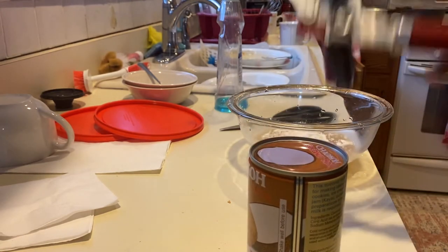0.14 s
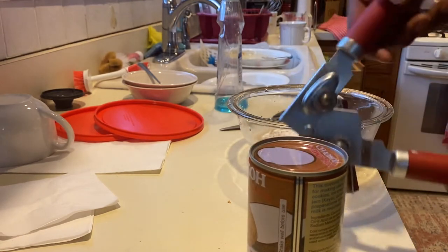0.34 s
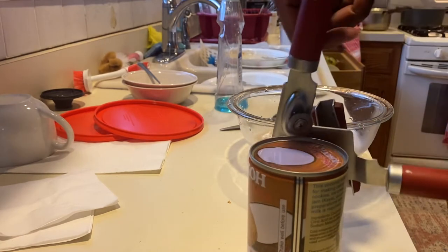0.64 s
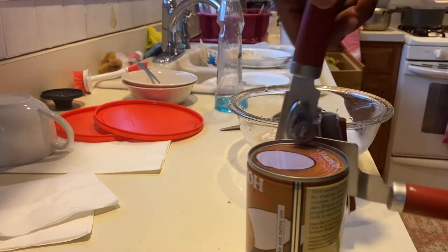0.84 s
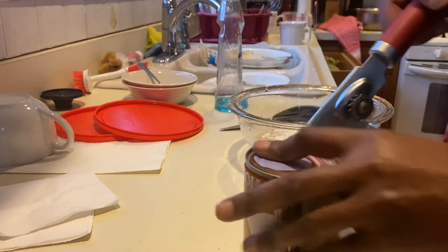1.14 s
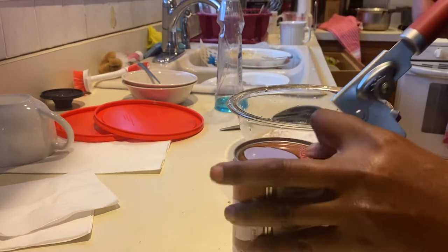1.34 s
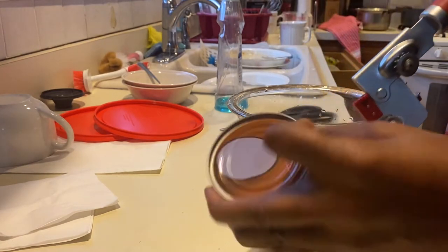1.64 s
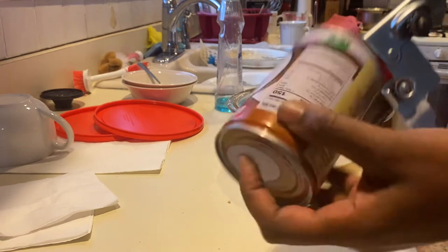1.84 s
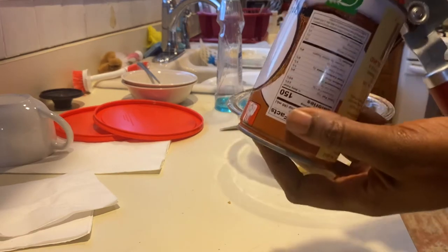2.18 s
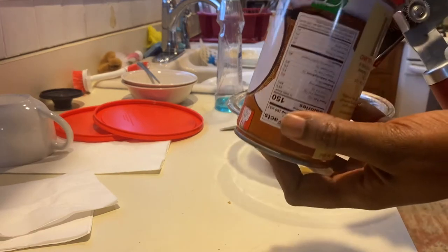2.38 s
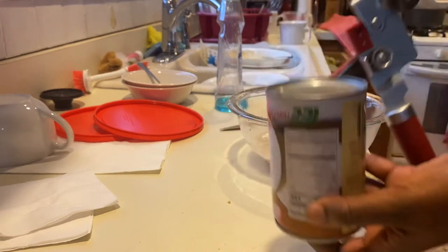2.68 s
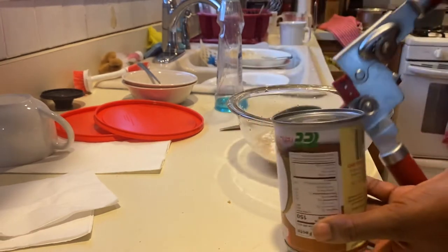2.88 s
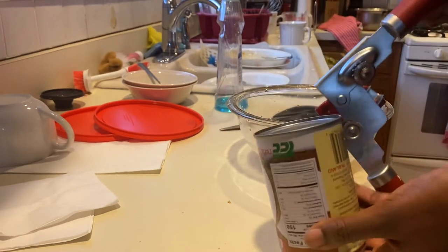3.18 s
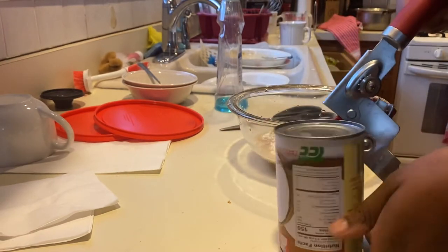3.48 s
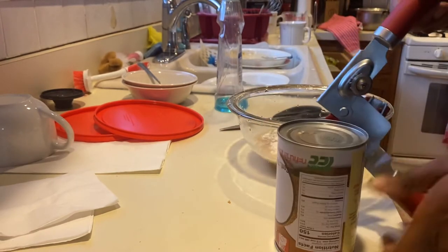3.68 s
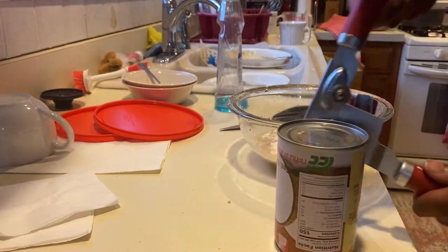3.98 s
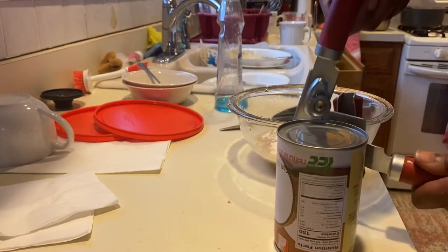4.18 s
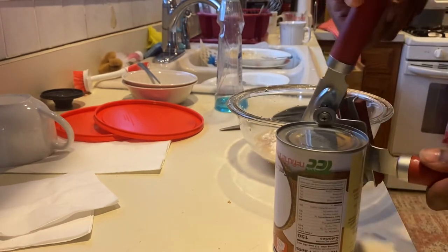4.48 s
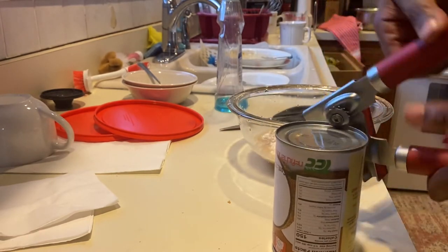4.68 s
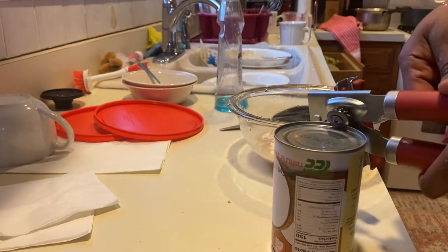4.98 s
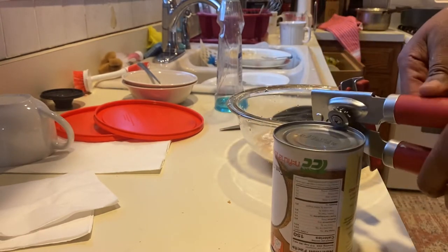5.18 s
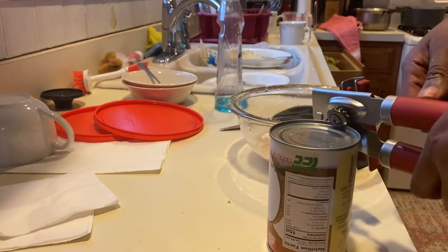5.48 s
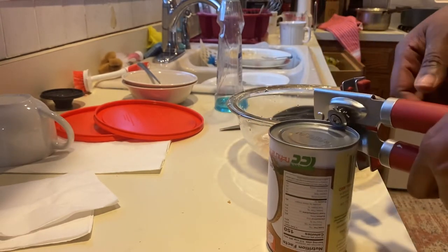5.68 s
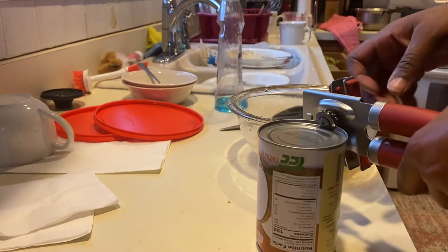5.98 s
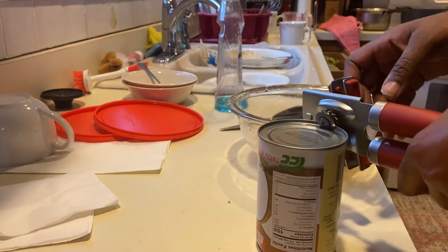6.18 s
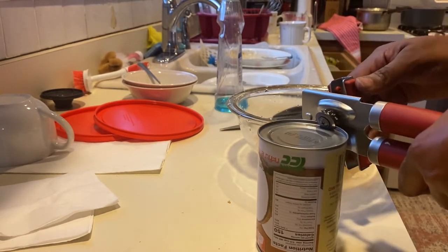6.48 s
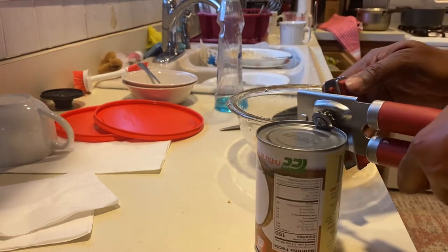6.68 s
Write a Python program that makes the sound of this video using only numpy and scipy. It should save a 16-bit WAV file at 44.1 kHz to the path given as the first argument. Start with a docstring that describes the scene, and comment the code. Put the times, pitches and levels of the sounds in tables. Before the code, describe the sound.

A faint low refrigerator hum with a dull rush runs throughout a small, hard kitchen with a short bright echo. After near quiet, the steel opener clacks on the can rim at about 0.65 s, with a rough scrape and lighter clack at 0.8 and soft handling at 1.0-1.5. The full can is turned: faint rising liquid gurgles at 1.8-2.05, a sharp can knock at 2.8, another at 3.0 with a short gurgle. Small clicks and scraping lead to the loudest early blow, a hard thud on the counter at 3.5. Opener clacks follow at 3.8, 4.2 (firm) and 4.8, then only slight rubbing. At 5.7 the blade punches the lid with a bright, ringing metallic crack. A thin, fluttering, whistling hiss fades away, with a tiny squeak near 6.1, before a sudden sputtering burst of air at 6.7 and a small clack at 6.8.

```python
"""In a small, hard kitchen a full tin can is turned over, set down on the counter and gripped with a can opener.
Steel clacks on the rim: each blow is noise and dying modes, shaped in five bands. Strokes are rough, filtered noise.
The contents gurgle as gliding sines, the blade punches the lid and air hisses in through the cut as whistling noise.
A refrigerator hums behind it as steady tones over dull noise, and the room adds a short echo."""
import sys
import numpy as np
from scipy import signal
from scipy.fft import rfft, irfft
from scipy.io import wavfile
from scipy.ndimage import uniform_filter1d

SR = 44100
rng = np.random.default_rng(int(sys.argv[2]) if len(sys.argv) > 2 else 0)


def to_wav(s):
    """Save 16-bit WAV."""
    ch = np.atleast_2d(s).T  # columns
    pcm = np.round(np.clip(ch, -1, 1) * 32767)  # PCM
    wavfile.write(sys.argv[1], SR, pcm.astype(np.int16))


N = 301644


def amp(db):
    """Decibels to gain."""
    return 10 ** (np.asarray(db) / 20)


def unit(x):
    """Scales to rms 1."""
    return x / np.sqrt(np.mean(x ** 2) + 1e-20)


def read(points, hz):
    """Reads (f/Hz, value) points on a log-frequency axis."""
    f, value = np.transpose(points)
    return np.interp(np.log(hz + 1), np.log(f + 1), value)


def add(mix, s, sound):
    """Mixes a stereo sound in at time s."""
    part = mix[:, max(round(s * SR), 0):][:, :sound.shape[1]]
    part += sound[:, :part.shape[1]]


def bins(size):
    """Frequencies of a spectrum, in Hz."""
    return np.fft.rfftfreq(size, 1 / SR)


# how alike the two microphones hear noise: (f/Hz, likeness: 1 same, 0 unrelated, negative leans to opposite)
STEREO_LIKENESS = [(60, 1), (200, 0.83), (500, 0.3), (1200, 0.065), (2300, 0.56), (6000, 1), (8800, -0.85),
                   (11200, 1), (13400, -0.69), (15300, 1)]


def noise_pair(size):
    """White noise at two microphones, with a likeness that depends on frequency."""
    left, other = rfft(rng.standard_normal((2, size)))
    like = np.clip(read(STEREO_LIKENESS, bins(size)), -1, 1)
    right = like * left + np.sqrt(1 - like ** 2) * other
    return irfft([left, right], size)


def tinted(x, colour):
    """Gives x a spectral colour, at rms 1."""
    return unit(irfft(rfft(x) * amp(read(colour, bins(N))), N))


def slow_gain(samples):
    """Random modulation at rms 1, smoothed over a number of samples."""
    return unit(uniform_filter1d(rng.standard_normal(N), samples))


def dying(x, t60s, stretch=1):
    """Lets each frequency of x die at its own speed."""
    hz, t, z = signal.stft(x, SR, nperseg=128)
    fade = amp(-60 * t / (stretch * read(t60s, hz)[:, None]))
    return signal.istft(z * fade, SR, nperseg=128)[1][:, :x.shape[1]]


def ring(hz, db, t60, t):
    """One dying mode, as a turning phasor."""
    return amp(db) * np.exp((2j * np.pi * hz - np.log(1000) / t60) * t)


def swell(s, rise, fall, db, curve):
    """Gain that peaks at time s and is 20 dB down a rise earlier and a fall later."""
    t = np.arange(N) / SR - s
    away = np.minimum(np.maximum(-t / rise, t / fall), 10)
    return amp(db - 20 * away ** curve)


# steady tones of mains and compressor: (f/Hz, rms level/dB before the stereo balance)
HUM_TONES = [(59.4, -50.5), (57, -58.5), (123.4, -58.5), (308, -72.5)]
# colour of the dull rush: (f/Hz, relative level/dB per Hz)
RUSH_COLOUR = [(25, -26), (40, -10), (80, -3), (105, 1), (160, -3), (200, -1), (250, -7), (380, -4),
               (520, -14), (800, -25), (2000, -40), (4000, -46), (10000, -51), (16000, -58)]
RUSH_DB = -57.5  # before the stereo balance


def refrigerator(waver=0.083):
    """Mains hum beats with the slightly slower compressor over a dull rush."""
    t = np.arange(N) / SR
    drift = unit(sum(np.sin(2 * np.pi * (f * t + rng.random())) for f in np.geomspace(.3, 4, 12)))
    hum = 0
    for hz, db in HUM_TONES:
        phase = 2 * np.pi * (hz * t + rng.random()) + waver * drift  # waver in radians
        hum = hum + amp(db) * unit(np.sin(phase))
    rush = amp(RUSH_DB) * tinted(noise_pair(N), RUSH_COLOUR)
    return (hum + rush) * amp([[1.3], [-1.3]])  # leans left


# decay of the room's echo: (f/Hz, t60/s)
KITCHEN_DECAY = [(100, .3), (500, 0.36), (1500, 0.42), (4000, 0.33), (8000, .3), (15000, 0.28)]


def kitchen(x, wet_db=-14, gap=0.0016):
    """Tiles and cupboards return a short, bright echo."""
    onset = np.clip(np.arange(SR) / SR / gap - 1, 0, 1)  # a silent gap (s), then an equally long rise
    tail = dying(noise_pair(SR), KITCHEN_DECAY) * onset
    return amp(wet_db) * signal.fftconvolve(x, tail / np.linalg.norm(tail[0]), axes=1)[:, :N]


# strokes of metal and fingers on the can and handles, and of the can on the counter:
# (peak t/s, rise t/s, fall t/s, level/dB before trim and balance)
STROKES = [(0.804, 0.058, 0.038, -36), (0.87, 0.057, 0.031, -47.5), (1.17, 0.089, .13, -43.5),
           (1.505, 0.026, 0.043, -45.5), (1.752, 0.038, 0.017, -58), (3.35, 0.089, .11, -49),
           (3.505, 0.041, 0.011, -34.5), (5.2, 0.11, 0.11, -56), (5.397, 0.049, 0.063, -63),
           (5.65, 0.1, 0.18, -65)]
# their colour: (f/Hz, relative level/dB)
STROKE_COLOUR = [(120, -9.5), (300, -3), (1000, -6), (2500, -13), (4000, -23), (7000, -27), (12000, -35.5),
                 (16000, -46)]


def scrapes(level_db=-2, grain_db=2.0, stutter_db=2.0, ring_db=0, curve=1.4):
    """Sliding contact: tiny catches and slower slips that set the can and the opener ringing."""
    catches = amp(grain_db * slow_gain(60) + stutter_db * slow_gain(500))
    hz = bins(N)
    modes = CAN_MODES + OPENER_MODES
    resonance = sum(1 / (1 + 1j * (hz - f) * t60 / 1.6) for f, _, t60 in modes)
    body = 1 + amp(ring_db) * resonance
    rub = irfft(rfft(noise_pair(N) * catches) * body, N)
    envelope = sum(swell(*stroke, curve) for stroke in STROKES)
    return amp(level_db) * tinted(rub, STROKE_COLOUR) * envelope


# gurgles of the contents, and a short squeak of air at 6.086 s:
# (t/s, starting f/Hz, final f/Hz, length t/s, starting level/dB before balance)
GLIDES = [(1.843, 610, 1138, .18, -54), (1.861, 1367, 1860, 0.088, -68), (2.042, 1060, 1176, 0.025, -48.5),
          (2.044, 1576, 1635, 0.026, -48), (2.975, 1110, 1199, 0.16, -43), (6.086, 2690, 2630, 0.047, -65)]


def gurgles_and_squeak(fade_db=18):
    """Gliding sines: the contents gurgle and change pitch as the liquid shifts; later, air squeaks briefly."""
    out = np.zeros((2, N))
    for s, start_hz, end_hz, length, db in GLIDES:
        u = np.arange(0, 1, 1 / (length * SR))
        hz = end_hz + (start_hz - end_hz) * (1 - u) ** 2
        envelope = amp(db - fade_db * u ** 2) * signal.windows.tukey(len(u), .2)
        tone = envelope * np.sin(2 * np.pi * np.cumsum(hz) / SR)
        add(out, s, np.array([tone, tone]))
    return out


LEAK_START_S, LEAK_END_S, LEAK_EDGE_S = 5.76, 6.8, .12
LEAK_DB, LEAK_SAG_DB_PER_S = -63, 15.5  # flow level at the start, and its sag
# bursts of inrushing air as the wheel bites: (peak t/s, rise t/s, fall t/s, level/dB)
AIR_BURSTS = [(6.68, .035, 0.056, -48.5), (6.717, 0.025, 0.023, -23.5)]
# colours of the thin leak and of the bursts: (f/Hz, relative level/dB)
LEAK_TINT = [(900, -1), (2000, -7), (4000, -11), (7000, -8.5), (9000, -11.5), (12000, -1), (16000, -6)]
BURST_TINT = [(500, -13), (1500, -11.5), (2600, -2.5), (4200, -10.5), (7000, -8), (12000, -2), (16000, -6)]
# whistling bands in the leak: (f/Hz, half-width f/Hz at half amplitude, level/dB over the flow)
LEAK_WHISTLES = [(2110, 60, -12), (3620, 60, -15), (7600, 90, -23)]


def air(sputter_db=3, flutter_db=4.0, grain_db=2, widen_db=-58, widen_rise=0.18, widen_fall=.07, curve=1.05):
    """Air is drawn in through the cut lid in fluttering, sagging whistles, then in sputtering bursts."""
    t = np.arange(N) / SR
    opening = np.clip((t - LEAK_START_S) / LEAK_EDGE_S, 0, 1)
    closing = np.clip((LEAK_END_S - t) / LEAK_EDGE_S, 0, 1)
    flow = opening * closing * amp(LEAK_DB - LEAK_SAG_DB_PER_S * (t - LEAK_START_S))
    # the cut widens around the main burst
    flow += swell(AIR_BURSTS[-1][0], widen_rise, widen_fall, widen_db, curve)
    grain = amp(grain_db * slow_gain(400))
    leak = tinted(noise_pair(N) * grain, LEAK_TINT) * flow
    for hz, width, db in LEAK_WHISTLES:
        flutter = amp(flutter_db * slow_gain(1800))
        resonance = 1 / (1 + ((bins(N) - hz) / width) ** 2)
        whistle = irfft(rfft(noise_pair(N)) * resonance, N)
        leak += amp(db) * flow * unit(flutter * whistle)
    sputter = amp(sputter_db * slow_gain(50))
    bursts = sum(swell(*burst, curve) for burst in AIR_BURSTS)
    return leak + tinted(noise_pair(N) * sputter, BURST_TINT) * bursts


# edges of the five bands of a blow, thud, body, clank, click and tick: (f/Hz)
BAND_EDGES = np.array([60, 300, 1000, 3000, 7000, 16000])
BAND_CENTRES = np.sqrt(BAND_EDGES[1:] * BAND_EDGES[:-1])
CONTACT_HZ = 1200  # above this the hardness of the contact tilts the spectrum


def struck(strength_db, hardness, thud_db, colour):
    """Band levels of one blow: the object's colour, brighter for a hard contact, with a thud below."""
    octaves = np.maximum(np.log2(BAND_CENTRES / CONTACT_HZ), 0)
    return strength_db + np.r_[thud_db, 0, colour] + hardness * octaves


def voiced(x, band_db, span=0.014):
    """Causal tone filter that steers a blow's five bands to their levels, its energy counted over span (s)."""
    size = x.shape[1]
    hz, z = bins(size), rfft(x)
    for _ in range(3):  # neighbouring bands interact, so repeat
        energy = np.histogram(hz, BAND_EDGES, weights=(abs(z) ** 2).mean(0))[0] * 2 / size
        gain = amp(band_db) / np.sqrt(energy / (span * SR))
        log_gain = read(np.c_[BAND_CENTRES, np.log(gain)], hz)
        mirrored = np.r_[log_gain, log_gain[-2:0:-1]]
        z = z * np.exp(signal.hilbert(mirrored).conj()[:len(hz)])  # minimum phase
    return z


# dense ringing of the touching parts: (f/Hz, t60/s before stretching)
CLATTER_DECAY = [(80, 0.26), (250, 0.14), (700, .09), (2000, 0.061), (5000, 0.028), (14000, 0.04)]
FIRM_DB, CLATTER_GROWTH = -30, .03  # blows stronger than a firm one clatter longer (dB of length per dB)


def blows(rows, modes, colour, thud_db, crack_db, shimmer_db, stretch, skew, lag, level_db,
          contact=0.0022, size=24576, count=16):
    """Each blow: a crack, dense clatter, a thud and the object's modes, with the bass arriving late.

    skew is the second microphone's phase (rad per kHz), lag the longest bass delay (s)."""
    out, t, hz = np.zeros((2, N)), np.arange(size) / SR, bins(size)
    # bending waves are slower the lower they are, so the thud sweeps downward
    delay = lag / (1 + (hz / 260) ** 2)
    bending = np.exp(-2j * np.pi * np.cumsum(delay) * SR / size)
    low_cut = signal.butter(4, 48, "highpass", fs=SR, output="sos")
    fade = np.clip((t[-1] - t) * 10 - .5, 0, 1)
    # a crowd of short upper partials gives the blow its shimmer
    upper_hz = np.geomspace(2500, 13000, count) * rng.uniform(1.0, 1.05, count)
    partials = modes + [(f, shimmer_db, .09) for f in upper_hz]
    rings = np.array([ring(*partial, t) for partial in partials])
    # each microphone hears its own phase
    ports = np.exp(1j * np.outer([0, skew], [f for f, _, _ in partials]) / 1000)
    for s, strength_db, hardness, weight_db, thud_hz, ring_db in rows:
        band_db = struck(strength_db, hardness, weight_db, colour)
        length = stretch * amp(CLATTER_GROWTH * (strength_db - FIRM_DB))
        hit = dying(noise_pair(size), CLATTER_DECAY, length)
        hit += amp(crack_db) * noise_pair(size) * np.exp(-t / 0.0027)
        turn, luck = rng.uniform(-0.95, 1, (2, len(rings)))  # each blow lands on another spot
        spot = amp(2 * luck) * np.exp(1j * np.pi * turn)
        hit += amp(ring_db) * ((ports * spot) @ rings).real
        hit += ring(thud_hz, thud_db, 0.11, t).imag
        hit *= 1 - np.exp(-t / contact)  # the contact takes a moment to build
        late_bass = irfft(voiced(hit, band_db) * bending)
        add(out, s, amp(level_db) * fade * signal.sosfilt(low_cut, late_bass))
    return out


# Tables of each struck object (the levels are relative, and trimmed later):
# hits: (t/s, strength level/dB, hardness dB/octave, thud level/dB over body, thud f/Hz, free ringing level/dB)
# modes: (f/Hz, level/dB, t60/s); tints: (clank, click, tick level/dB over body, before hardness)
# counter, and at 0.651 s the opener thumping the rim: hits, modes, tint
THUMP_HITS = [(0.651, -42.5, 5.5, 21, 211, -34), (0.842, -52, 7, 22, 172, -26.5),
              (1.502, -41, -10, 3, 230, -18.5), (3.009, -32.5, -4, 10, 200, -15.5),
              (3.037, -40, -4, 13.5, 130, -17.5), (3.5115, -14.5, 3, 1, 139, -18),
              (3.526, -15, -1.5, -1.5, 178, -20.5), (3.639, -30.5, -3.5, 4.5, 141, -21.5)]
THUMP_RINGS = [(58.3, 0, 0.44), (155.2, 8.5, 0.1), (302, -4, 0.26), (455, -8, 0.25), (550, -2, 0.043),
               (663, -8.5, .13), (917, 3, 0.066), (1204, -12.5, 0.11), (1633, -6, .12), (2196, -5.5, 0.14)]
THUMP_TINT = (-0.82, -17.5, -35.5)


def counter_blows_and_rim_thump():
    """The counter is struck, and the opener thumps the rim at 0.651 s: all with low, long modes."""
    return blows(THUMP_HITS, THUMP_RINGS, THUMP_TINT, thud_db=-6, crack_db=-3, shimmer_db=-8.0,
                 stretch=1, skew=.3, lag=0.0083, level_db=-2.5)


# can: hits, modes (which also colour the scrapes), tint
CAN_HITS = [(1.021, -39.5, -3.5, 2.5, 318, -22), (1.846, -43.5, -7, -4.5, 411, -14),
            (1.915, -51.5, 2.5, -18, 400, -31), (2.141, -44.5, 2, -20, 438, -15.5),
            (2.738, -49.5, -31, 5, 198, -9), (2.808, -24.5, 1.26, -19.5, 455, -15),
            (2.895, -38.5, 2.5, -19.5, 400, -16.5), (2.99, -20, -5.5, -3, 457, -19.5),
            (3.322, -40.5, -4, -3, 600, -16)]
CAN_MODES = [(460, 12, 0.066), (641, -9, 0.098), (816, -6.5, 0.24), (885, -5.5, 0.057), (1314, -7.5, 0.082),
             (1567, 7, 0.054), (1784, -6, 0.2), (1890, -16, .22), (2186, -14, .14), (3970, -6, 0.12),
             (4700, -2, .11)]
CAN_TINT = (-9.5, -22.5, -26)


def can_blows():
    """The full can is struck: a sharp crack and the can's modes."""
    return blows(CAN_HITS, CAN_MODES, CAN_TINT, thud_db=-7.5, crack_db=5.5, shimmer_db=-8,
                 stretch=.85, skew=1.0, lag=.008, level_db=-1)


# opener: hits, modes (which also colour the scrapes), tint
OPENER_HITS = [(0.028, -70.5, 10.5, 10, 200, -18), (0.668, -26.5, -4, -8.5, 217, -14),
               (0.798, -33.5, -1.5, 2, 189, -20.5), (0.931, -55.5, 1.5, 14.5, 205, -16),
               (1.05, -43.5, 0.5, 10, 165, -18), (3.168, -46.5, -1, 6.5, 167, -8),
               (3.188, -44.5, .5, 7, 130, -8.5), (3.347, -38, 2, 0, 205, -8.5),
               (3.388, -42, 2, 5.5, 175, -18), (3.412, -45, 2.5, 9, 186, -8),
               (3.826, -41, -0.5, -1, 147, -28), (3.833, -31, -5.5, 2, 146, -17.5),
               (3.997, -47.5, 1.1, 10, 148.5, -14.5), (4.214, -25.5, 0.8, 2, 197, -10.5),
               (4.594, -45, 0.8, 4, 205, -9.5), (4.8, -31, -4, 1.5, 306, -16),
               (6.799, -37.5, -3, 2.5, 156.3, -16)]
OPENER_MODES = [(305.9, -1, 0.086), (587.4, -9, 0.15), (956.6, 1, 0.045), (1256, -6, 0.028),
                (1399, -7, 0.13), (1915, -7, 0.075), (2005, -3.5, 0.12), (2420, -11.5, 0.072),
                (2600, -9.5, 0.076), (3434, -12, 0.25), (4870, -8.5, 0.11), (6850, -14.5, 0.11)]
OPENER_TINT = (-5.5, -16, -20)


def opener_blows():
    """The steel opener clacks, ringing in its own modes."""
    return blows(OPENER_HITS, OPENER_MODES, OPENER_TINT, thud_db=-11, crack_db=-1, shimmer_db=-13.5,
                 stretch=1.05, skew=0.26, lag=0.017, level_db=-1.5)


# lid: hits, modes, tint
LID_HITS = [(5.702, -46.5, 0.2, -12.5, 398.5, -18.5), (5.7145, -19.5, -2.2, -10.5, 406.4, -24.5),
            (5.7185, -19.5, 1.96, -4.5, 377.7, -10.5)]
LID_RINGS = [(449.3, -4.5, 0.086), (1083, -3.5, 0.088), (1392, 11.5, 0.11), (1373, -13.5, 0.34),
             (1420, -14.5, 0.25), (2077, -14.5, 0.072), (2640, -14, .08), (4480, -8.5, 0.088),
             (7500, -15, 0.12)]
LID_TINT = (5.4, -7.5, -7.5)


def lid_blows():
    """The blade punches the lid, whose clank band stands above its body."""
    return blows(LID_HITS, LID_RINGS, LID_TINT, thud_db=-18.0, crack_db=-3.5, shimmer_db=-19,
                 stretch=0.8, skew=0.97, lag=0.016, level_db=0.5)


def scene():
    """The work at the counter, its echo and the hum."""
    strikes = counter_blows_and_rim_thump() + can_blows() + opener_blows() + lid_blows()
    handling = strikes + gurgles_and_squeak() + scrapes()
    work = handling * amp([[.9], [-.9]]) + air()  # the handling leans left
    return refrigerator() + kitchen(work) + work


CEILING, CUTOFF_HZ = .85, 15950  # peak level (full scale 1), top of the band


def record(dry):
    """The recorder rounds off the highest peaks, then limits the band."""
    held = dry / (1 + (dry / CEILING) ** 6) ** (1 / 6)
    lowpass = signal.firwin(401, CUTOFF_HZ, window=("kaiser", 9), fs=SR)
    return signal.oaconvolve(held, lowpass[None], "same")


dry = scene()
out = record(dry)
to_wav(out)
```